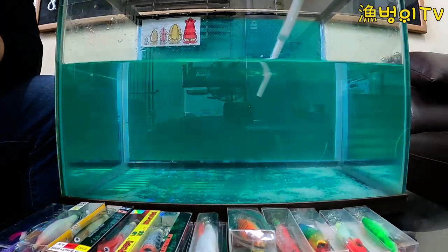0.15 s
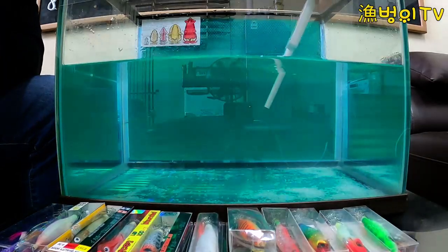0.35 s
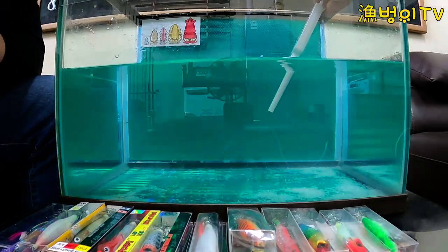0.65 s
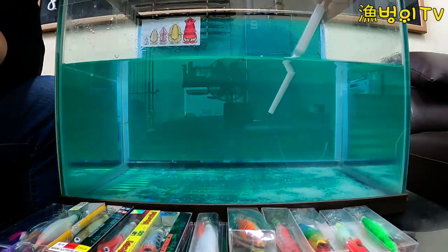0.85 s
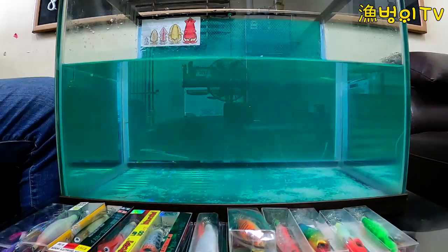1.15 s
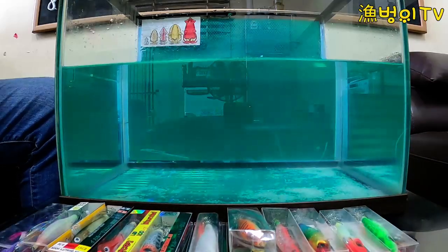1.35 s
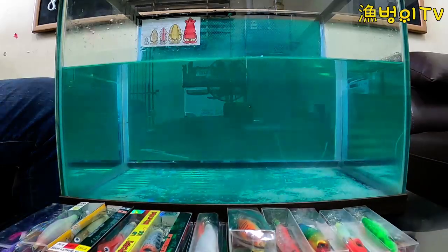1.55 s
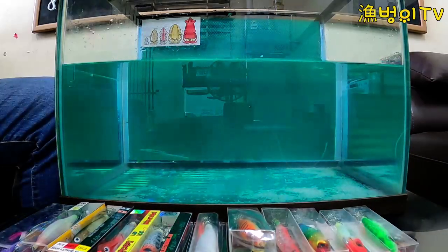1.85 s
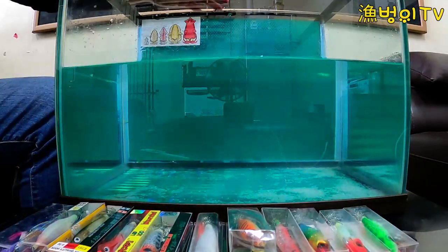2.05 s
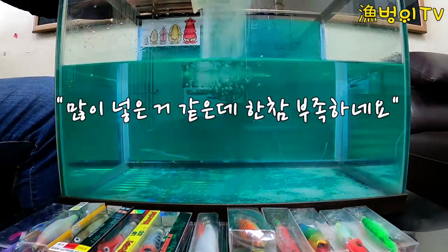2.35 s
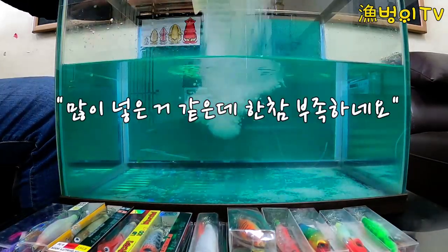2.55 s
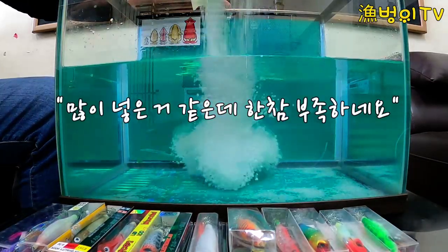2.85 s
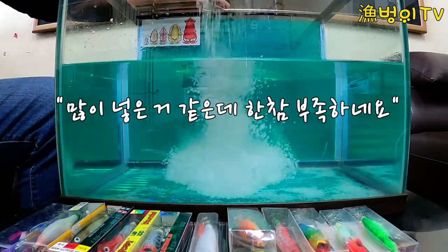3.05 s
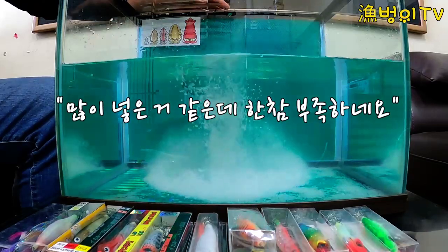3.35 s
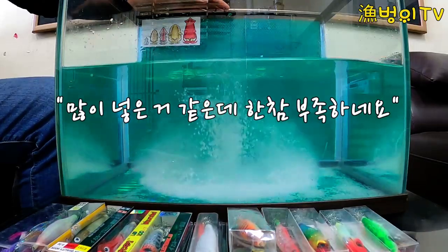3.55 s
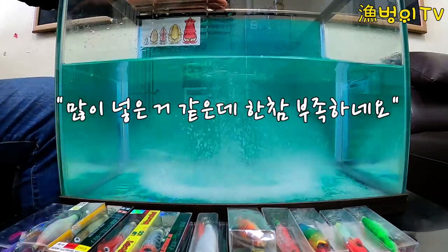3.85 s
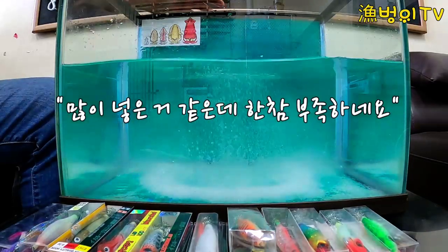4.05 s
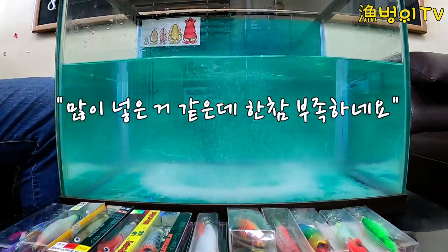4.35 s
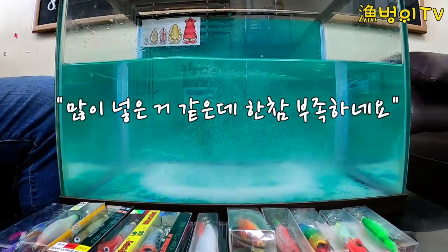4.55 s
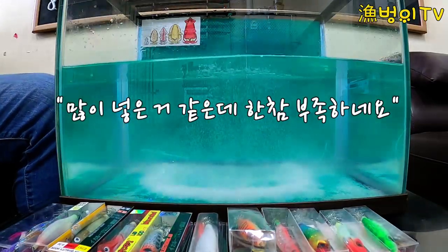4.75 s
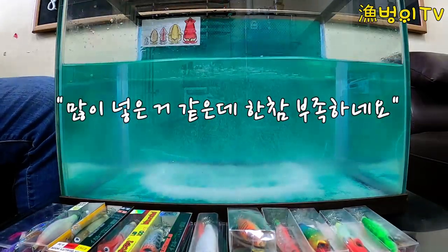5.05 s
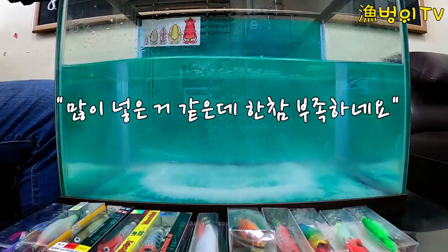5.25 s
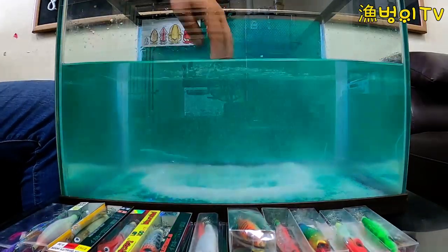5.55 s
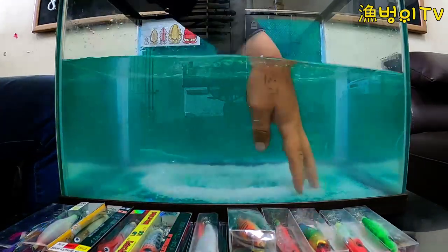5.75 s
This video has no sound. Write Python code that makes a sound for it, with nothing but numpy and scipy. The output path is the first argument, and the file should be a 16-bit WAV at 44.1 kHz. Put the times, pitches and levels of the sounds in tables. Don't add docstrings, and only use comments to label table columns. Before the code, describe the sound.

Coarse salt is scooped and knocked about in a hollow plastic tub, poured hissing into a glass tank twice, then shaken out, with faint ripples at the end.

```python
import sys
import numpy as np
from scipy import signal
from scipy.fft import rfft, irfft
from scipy.io import wavfile
from scipy.ndimage import uniform_filter1d

SR = 44100
rng = np.random.default_rng(int(sys.argv[2]) if len(sys.argv) > 2 else 0)


def unload_audio(sound):
    columns = np.transpose(np.atleast_2d(sound))
    steps = np.round(np.clip(columns, -1, 1) * 32767)
    wavfile.write(sys.argv[1], SR, steps.astype(np.int16))


def elevation(decibels):
    levels = np.asarray(decibels, float)
    return 10 ** (levels / 20)


N = 260190

# frequency_hz [Hz], level_db [dB per Hz]
GRAIN_SPECTRUM = [(130, -26.5), (290, -2), (380, -13), (580, -10), (980, -12.5), (1450, -8), (2050, -2.5),
                  (2750, -9.5), (3500, -4), (4000, -3.5), (4400, -2), (4900, -0.5), (5800, 1), (7000, 6.5)]
# frequency_hz [Hz], change_db [dB re first pour]
TILTED_TUB = [(600, 2.5), (850, 0), (1100, 4.5), (1500, 0), (2050, 0), (2750, 1.5), (3500, 0.5), (4250, -3),
              (4900, 4), (5800, -2), (6600, 2), (8500, 0)]
# frequency_hz [Hz], change_db [dB re first pour]
SPILLING_TUB = [(600, 1), (900, 7), (1250, 0), (1800, 0.5), (2200, -1), (2750, 2.5), (3500, -1.5),
                (4250, 1), (4900, 1.5), (5800, 2.5), (6800, 2), (8500, 2.5)]
# frequency_hz [Hz], change_db [dB re first pour]
EMPTY_TUB = [(500, 3.5), (750, 3.5), (1100, 5), (1500, 2), (2050, -3), (2750, 2), (3500, -4.5),
             (5000, -0.5), (7000, -0.5)]
TILT_S, SPILL_S, LAST_SHAKE_S = 3.75, 4.12, 4.7


def salt():
    s, (rush_db, fine_db, mass_db, boom_db) = movement()
    hits = grains(per_s=14000, spread_db=1.5, clump_db=0.51)
    out = singing(hits[0])

    posture = np.searchsorted([TILT_S, SPILL_S, LAST_SHAKE_S], np.arange(N) / SR)
    postures = [hits, shaped(hits, TILTED_TUB), shaped(hits, SPILLING_TUB), shaped(hits, EMPTY_TUB)]
    hits = through_wall(np.choose(posture, postures))

    ranges = [([130, 420], boom_db - 11.0),
              ([420, 700, 1150], mass_db - 3.5),
              ([1276, 1700, 2860, 4215], rush_db - 0.5),
              ([4200, 5800, 30000], fine_db + 3.5)]
    for edges_hz, range_db in ranges:
        level_db = np.interp(np.arange(N) / SR, s, range_db)
        parts = 0
        for low_hz, high_hz in zip(edges_hz, edges_hz[1:]):
            swell_db = 0.8 * drift(5) + 1.1 * drift(20)
            parts = parts + elevation(swell_db) * coloured(hits, GRAIN_SPECTRUM, low_hz, high_hz)
        out = out + elevation(level_db) * rms_one(parts)
    return out


def grains(per_s, spread_db, clump_db):
    sizes = elevation(spread_db * np.minimum(rng.exponential(1, (2, N)), 5))
    signs = rng.choice([-1, 1], (2, N))
    struck = rng.random((2, N)) < per_s / SR
    return rms_one(sizes * signs * struck * elevation(clump_db * drift(46.0)))


# time_s [s], flow_db [dB], lumps_db [dB]
POUR_ONE = [
    (1.87, -61, -3),
    (1.92, -32.5, 8),
    (2.08, -33, 16.5),
    (2.13, -28, 8.5),
    (2.33, -30, 4),
    (2.7, -26.5, 2.5),
    (3.1, -27.5, 4.5),
    (3.3, -34.5, 7),
    (3.43, -46, 6),
]
POUR_TWO = [
    (3.7, -49, -20),
    (3.81, -40, -3),
    (3.902, -31.5, 3.5),
    (3.98, -25.5, 3),
    (4.11, -30.5, 4),
    (4.24, -29.5, 9),
    (4.33, -35.5, 14.5),
    (4.41, -44, 18),
    (4.48, -58, 19),
]
# start_s [s], level_db [dB], settling [dB per s], fine_db [dB], lumps_db [dB]
JOLT_EVENTS = [(1.097, -44, 200, -8, 0), (1.137, -39, 400, -12, 2), (1.18, -44, 250, -4, 0),
               (1.255, -41, 250, -1, 0), (1.512, -37, 76, 1, 1), (1.65, -42.5, 150, 6, -4),
               (1.662, -40, 200, 0, 2), (1.69, -43, 100, -6, 0), (1.726, -44.5, 302, -2, 7),
               (1.778, -35, 42, -2, 2), (1.897, -45, 64, 8.5, 6), (2.122, -46, 60, 0, -9),
               (3.421, -36, 500, 0, -1), (3.432, -35, 349, -6, -13), (3.445, -39, 170, -4, -14),
               (3.513, -42, 43, -6, -2), (3.594, -46, 58, 0, -8), (3.745, -47.5, 60, 6, -10),
               (3.797, -36, 90, -2, -11), (4.729, -40, 300, -20, 0), (4.741, -42.5, 16, -11, 2),
               (4.834, -39, 74, 4, -11), (5.041, -33.5, 103, -8.5, -15), (5.206, -27.5, 197, -17, -8.5),
               (5.226, -34.5, 102, -7, 3)]
# peak_s [s], level_db [dB], settling [dB per s], fine_db [dB], lumps_db [dB]
SWAY_EVENTS = [
    (1.11, -61, 62, -7, 14),
    (1.16, -38.5, 105, -9.5, 4),
    (1.27, -40, 115, 2, 7.5),
    (1.33, -32.5, 120, -47, 4),
    (3.98, -36.5, 94, -10, 1),
    (4.17, -37, 110, 5, -10),
    (4.891, -25.5, 137, -3.5, -0.5),
]
# peak_s [s], level_db [dB], fading [dB per s]
FLEX_EVENTS = [(1.12, -31, 60), (1.27, -26.5, 157), (1.67, -53, 64), (1.78, -30.5, 54), (1.91, -38, 100),
               (2.11, -26.5, 76), (2.8, -28.5, 20), (3.1, -32.5, 97), (3.98, -40, 117), (4.29, -34.5, 103),
               (4.89, -30, 132), (5.09, -49, 60)]
# levels of rush, fine, lumps and boom [dB]
STRAY_DB = [-53, -56, -57.5, -99]
# start_s [s], end_s [s]
STRAY_S = (1.066, 5.4)
JOLT_RISE_DB_PER_S, SWAY_RISE_SHARE = 1302, 2
FINE_SETTLING, LUMP_SETTLING = 1, 1.55
FULL_FLOW_DB, FINE_RE_FLOW_DB, LUMP_RE_FLOW_DB = -28, 0, -11.5
FINE_FOLLOWS, LUMP_FOLLOWS, FINE_LOST_TO_LUMPS = 1.11, 1.94, 0.29


def movement():
    t = np.arange(0, N, 40) / SR
    falling = (t > STRAY_S[0]) & (t < STRAY_S[1])
    power = elevation(2 * np.array(STRAY_DB))[:, None] * falling + 1e-12

    for pour in (POUR_ONE, POUR_TWO):
        s, flow_db, lumps_db = np.transpose(pour)
        flow = np.interp(t, s, flow_db - FULL_FLOW_DB, left=-90, right=-90)
        lumps = np.interp(t, s, lumps_db)
        fine = FINE_RE_FLOW_DB + FINE_FOLLOWS * flow - FINE_LOST_TO_LUMPS * lumps
        mass = LUMP_RE_FLOW_DB + LUMP_FOLLOWS * flow + lumps
        power[:3] += elevation(2 * (FULL_FLOW_DB + np.array([flow, fine, mass])))

    for rows, sudden in ((JOLT_EVENTS, True), (SWAY_EVENTS, False)):
        s, db, fall, fine_db, lumps_db = np.transpose(rows)
        rise = JOLT_RISE_DB_PER_S if sudden else SWAY_RISE_SHARE * fall
        power[0] += surges(s, db, rise, fall)
        power[1] += surges(s, db + fine_db, rise, FINE_SETTLING * fall)
        power[2] += surges(s, db + lumps_db, rise, LUMP_SETTLING * fall)

    s, db, fade = np.transpose(FLEX_EVENTS)
    power[3] += surges(s, db, fade, fade)
    return t, 10 * np.log10(power)


def surges(s, peak_db, rise, fall):
    after = np.arange(0, N, 40)[:, None] / SR - s
    return np.sum(elevation(2 * (peak_db + np.minimum(after * rise, -after * fall))), axis=1)


# frequency_hz [Hz], width_hz [Hz], lift_db
# [dB]
WALL_MODES = [(284, 30, 2.5), (580, 31, 1.5), (705, 36, -6.5), (962, 42, -5.5), (1250, 24, 5),
              (1427, 24, 6.5), (1510, 13, 1), (2335, 69, 3.5), (3300, 80, 2), (4270, 91, -3.5),
              (4830, 110, -1.5), (6500, 150, 1), (11550, 310, -12.5)]


def through_wall(x):
    hz = np.fft.rfftfreq(N, 1 / SR)[:, None]
    centre, width, lift = np.transpose(WALL_MODES)
    gain_db = np.sum(lift / (1 + (2 * (hz - centre) / width) ** 2), axis=1)
    return irfft(rfft(x) * elevation(gain_db), N)


# start_s [s], length_s [s], from_hz [Hz], to_hz [Hz], level_db [dB]
SINGING_PATCHES = [(1.15, 0.047, 1750, 1870, -40), (1.31, 0.077, 4100, 3700, -48),
                   (1.33, 0.045, 6700, 6900, -50), (1.32, .04, 940, 960, -39),
                   (1.51, 0.075, 5100, 4700, -48), (1.68, 0.046, 3000, 3100, -44),
                   (1.89, 0.12, 5500, 5600, -42), (1.9, 0.075, 7300, 7000, -40),
                   (1.91, 0.16, 1800, 1920, -39), (2.37, 0.36, 7700, 7600, -42),
                   (2.07, 0.18, 1450, 1440, -44.5), (4.725, .08, 1300, 1440, -53),
                   (4.725, .06, 2300, 1900, -46), (4.726, .09, 3100, 2900, -47),
                   (2.5, .15, 5600, 5500, -42), (5.21, .09, 3100, 2900, -43), (5.04, .06, 3000, 2800, -46),
                   (4.87, .07, 4400, 4000, -40), (5.2, 0.057, 1100, 1200, -38),
                   (2.08, .18, 1810, 1860, -40.5), (2.11, 0.13, 3700, 4000, -41.5),
                   (2.42, 0.27, 3600, 3200, -44), (2.42, 0.32, 5800, 6500, -46),
                   (2.74, 0.3, 2200, 1940, -39), (2.77, 0.31, 3700, 3400, -48),
                   (3.01, 0.39, 2150, 1850, -43), (2.82, 0.19, 590, 570, -43.5),
                   (3.93, 0.09, 5400, 4500, -37), (3.94, 0.16, 7200, 6600, -38),
                   (3.94, 0.14, 3800, 2960, -40), (3.93, 0.2, 1600, 1500, -41.5),
                   (4.12, .11, 6300, 7400, -41), (4.16, 0.12, 900, 930, -42), (4.14, 0.15, 1800, 1840, -41),
                   (4.18, 0.095, 2540, 2800, -36.5), (4.87, .06, 3100, 3300, -40),
                   (4.84, 0.054, 7100, 6300, -37), (5.2, 0.075, 2400, 1300, -40),
                   (5.035, 0.074, 1640, 1950, -42)]


def singing(hits):
    out = np.zeros(N)
    for s, length, from_hz, to_hz, db in SINGING_PATCHES:
        i, share = round(s * SR), np.linspace(0, 1, round(length * SR))
        turn = np.exp(2j * np.pi * np.cumsum(from_hz + (to_hz - from_hz) * share) / SR)
        narrow = signal.butter(2, 0.1 * from_hz, fs=SR, output="sos")
        slow = signal.sosfilt(narrow, hits[i:i + len(share)] / turn)
        add_at(out, s, elevation(db) * rms_one((slow * turn).real) * np.sin(np.pi * share))
    return out


# start_s [s], peak_db [dB], pitch_hz [Hz], crack_db [dB re peak], t60_s [s]
SNAP_EVENTS = [(1.107, -40, 1900, -3, 0.028), (1.1468, -9.5, 1930, 7.5, 0.0082),
               (1.2257, -37, 1910, -12, 0.022), (1.263, -23, 1760, 3, 0.022),
               (1.2987, -23.5, 3900, 3, 0.032), (1.3143, -16.5, 1940, 3, 0.028),
               (1.403, -29, 1700, -7, 0.014), (1.4312, -35, 1760, -29, 0.037),
               (1.5094, -30, 1700, -27, 0.0039), (1.6583, -21.5, 2200, 5.5, 0.016),
               (1.7752, -16, 1750, -2.5, 0.018), (2.0748, -16, 1700, -4, 0.0071),
               (3.42, -23, 1790, 12, 0.0076), (3.5084, -21.5, 1570, -2, 0.037),
               (3.6384, -30, 2140, 0, 0.018), (3.6732, -30, 1960, 0, 0.02), (3.698, -32, 2180, 6, 0.012),
               (4.728, -37, 1290, -40, 0.013), (4.7675, -37, 1450, -40, 0.035),
               (5.039, -28, 1730, -6, 0.058), (5.208, -26, 1900, -5, 0.029)]
CRACK_HZ = 4360


def snaps():
    length = 2000
    out, t = np.zeros(N + length), np.arange(length) / SR
    for s, peak_db, hz, crack_db, t60 in SNAP_EVENTS:
        rattle = rng.standard_normal(length) * elevation(-60 * t / t60) * np.minimum(t / 0.0004, 1)
        blow = rattle - 2.5 * (np.arange(length) == 8)
        wall = band_pass(blow, 0.87 * hz, 1.14 * hz)
        crack = band_pass(blow, 0.72 * CRACK_HZ, 1.45 * CRACK_HZ)
        crack = crack + elevation(-14.5) * np.diff(blow, n=2, prepend=[0, 0])
        knock = peak_one(wall) + elevation(crack_db + 5.5) * peak_one(crack)
        add_at(out, s, elevation(peak_db + 6.0) * peak_one(knock))
    return signal.sosfilt(signal.butter(3, 10500, fs=SR, output="sos"), out[:N])


# start_s [s], peak_db [dB], pitch_hz [Hz],
# t60_s [s]
THUD_EVENTS = [(1.104, -23.5, 221, 0.1), (1.148, -11, 420, 0.028), (1.184, -32, 167, 0.16),
               (1.264, -14, 208, 0.091), (1.431, -23, 442, 0.045), (1.659, -28, 212, 0.058),
               (1.66, -21, 480, 0.033), (0.031, -31, 50.3, 0.58), (1.775, -30, 247, 0.19),
               (1.929, -21, 513, 0.078), (2.0748, -3.5, 551, 0.02), (2.107, -6.5, 279, 0.051),
               (2.752, -22.5, 285.6, 0.21), (2.81, -19, 314, 0.077), (3.416, -34, 273, 0.077),
               (3.508, -8, 583, 0.022), (3.511, -15.5, 260, 0.031), (4.725, -31, 156, 0.06),
               (4.879, -21, 654, 0.068), (4.86, -23.5, 117, 0.15), (4.87, -24, 170, .12),
               (2.17, -28, 200, .15), (1.98, -29, 250, .12), (2.18, -30.5, 61.6, 0.66),
               (1.901, -25.5, 276, 0.091)]


def thuds():
    length = 8000
    out = np.zeros(N + length)
    soft = 1 - np.exp(-np.arange(length) / SR / 0.0019)
    for s, peak_db, hz, t60 in THUD_EVENTS:
        body = ring(length, hz, t60)
        body += 0.92 * ring(length, 1.83 * hz, 0.38 * t60)
        body += 0.29 * ring(length, 0.6 * hz, 1.74 * t60)
        add_at(out, s, elevation(peak_db - 3.5) * soft * body)
    return out[:N]


def ring(length, hz, t60):
    t = np.arange(length) / SR
    return np.sin(2 * np.pi * hz * t) * elevation(-60 * t / t60)


# start_s [s],
# peak_db [dB], centre_hz [Hz]
TAP_EVENTS = [(0.985, -38, 7000), (1.0663, -38, 7000), (1.1468, -26, 6500), (1.3148, -21, 4500),
              (1.66, -22, 9500), (3.6985, -26, 4970), (1.51, -26, 2500), (1.4317, -21.5, 2500),
              (1.146, -20, 3000), (1.776, -17, 3500), (2.0746, -7.5, 1660), (2.107, -11.5, 3500),
              (3.4205, -24, 6500), (3.5946, -30, 3500), (3.613, -33, 4550), (3.752, -33, 5000),
              (4.7415, -27, 1700), (5.2045, -27, 4500), (3.5076, -12, 2200), (3.5092, -18, 2000),
              (3.926, -13, 2500)]


def taps():
    out = np.zeros(N)
    push = -1.0 * (np.arange(400) == 0)
    for s, peak_db, hz in TAP_EVENTS:
        add_at(out, s, elevation(peak_db) * peak_one(band_pass(push, 0.47 * hz, 1.87 * hz)))
    return out


# start_s [s], length_s [s], centre_hz [Hz], width [share], level_db [dB]
RIPPLE_EVENTS = [
    (5.543, .03, 4600, .5, -65),
    (5.602, .1, 2070, .06, -53),
    (5.64, 0.041, 3400, .06, -57),
    (5.645, .14, 5200, 0.71, -55.5),
    (5.66, .12, 1800, .25, -57),
    (5.702, 0.09, 7000, .1, -58),
    (5.62, .06, 8100, .06, -60),
    (5.81, 0.06, 7000, .4, -58.5),
    (5.88, .02, 4000, .5, -63),
]


def ripples():
    out = np.zeros(N + SR)
    for s, length, hz, width, db in RIPPLE_EVENTS:
        share, width = np.linspace(0, 1, round(length * SR)), np.clip(width, 0.02, 0.8)
        noise = rng.standard_normal(9000)
        fizz = band_pass(noise, hz * (1 - width), hz * (1 + width))[-len(share):]
        add_at(out, s, elevation(db) * rms_one(fizz) * np.sin(np.pi * share ** 0.57))
    return out[:N]


def shop(x):
    t = np.arange(SR // 3) / SR
    tails = rng.standard_normal((2, len(t))) * elevation(-60 * t / 0.4) * (t > 0.006)
    tails = tails / np.sqrt(np.sum(tails[0] ** 2))
    return signal.fftconvolve(x[None], tails, axes=1)[:, :N]


# frequency_hz [Hz], level_db [dB per Hz]
VENTILATION_SPECTRUM = [(25, -9), (42, -5), (60, 4.5), (80, -4), (150, -6), (250, -3), (350, -7), (500, -9),
                        (700, -15), (1000, -23), (2000, -30), (2600, -37), (3700, -43), (5400, -45.5),
                        (6900, -40.5), (9000, -40)]
# [dB, air above 2.5 kHz]
VIEW_LEVELS = [
    (-41.5, -1),
    (-42, 8),
    (-42, 0),
]
# start_s [s], end_s [s]
SCENE_CHANGES = [
    (.9862, 1.066),
    (5.5015, 5.541),
]


def ventilation():
    white = rng.standard_normal((2, N))
    view = np.searchsorted([end for start, end in SCENE_CHANGES], np.arange(N) / SR)
    low = coloured(white, VENTILATION_SPECTRUM, high_hz=2500)
    high = coloured(white, VENTILATION_SPECTRUM, low_hz=2500)
    rumble_db, hiss_db = np.array(VIEW_LEVELS)[view].T
    scale = elevation(rumble_db + 1.3 * drift(9.6)) / np.sqrt(np.mean(low ** 2))
    return scale * (low + elevation(hiss_db + 1.5 * drift(5.0)) * high)


def rms_one(x):
    return x / np.sqrt(np.mean(x ** 2) + 1e-20)


def peak_one(x):
    return x / np.abs(x).max()


def add_at(out, s, burst):
    i = round(s * SR)
    out[i:i + len(burst)] += burst


def band_pass(x, low_hz, high_hz):
    return signal.sosfilt(signal.butter(2, [low_hz, high_hz], "band", fs=SR, output="sos"), x)


def high_pass(x, hz, order):
    return signal.sosfiltfilt(signal.butter(order, hz, "high", fs=SR, output="sos"), x)


def at_hz(points, hz):
    known_hz, values = np.transpose(points)
    return np.interp(np.log(hz), np.log(known_hz), values)


def drift(rate_hz):
    r = np.exp(-80 * np.pi * rate_hz / SR)
    slow = signal.lfilter([1], [1, -2 * r, r * r], rng.standard_normal(N // 40 + 2002))[2000:]
    return np.interp(np.arange(N) / 40, np.arange(len(slow)), rms_one(slow))


def shaped(x, spectrum):
    return irfft(rfft(x) * elevation(at_hz(spectrum, np.fft.rfftfreq(N, 1 / SR) + 1)), N)


# frequency_hz [Hz], side_db [dB re mid]
SIDE_SPECTRUM = [(40, -28), (250, -24), (600, -22), (1000, -25), (4000, -24), (9000, -20), (13000, -6)]


def coloured(x, spectrum, low_hz=1, high_hz=30000):
    hz = np.maximum(np.fft.rfftfreq(N, 1 / SR), 1)
    window = 1 / np.sqrt((1 + (low_hz / hz) ** 14) * (1 + (hz / high_hz) ** 14))
    gain = elevation(at_hz(spectrum, hz)) * window * np.minimum(hz / 20, 1) ** 2
    mid, side = irfft(rfft(x) * gain * [np.ones_like(hz), elevation(at_hz(SIDE_SPECTRUM, hz))], N)
    return np.array([mid + side, mid - side])


# time_s [s], pan_db [dB, left minus right], width_db
# [dB]
TUB_PLACE = [(1.0, 0, -5), (1.07, 0.5, 13.5), (1.7, -.5, 12.5), (1.85, 0.5, 3), (2.25, -1, -3),
             (2.33, 0, -4), (2.421, 0, 2), (2.62, -0.5, -1.5), (2.7, -0.5, -7), (2.78, 0, 1.5), (3.3, 0, 0),
             (3.75, 0, -3.5), (4.22, 0, -1.5), (4.35, 0, -4.5), (4.75, 0, 0), (5.0, 0.1, 3.5),
             (5.6, 0.5, 5), (5.75, 3, -5)]


def scene():
    s, pan_db, width_db = np.transpose(TUB_PLACE)
    t, half = np.arange(N) / SR, np.array([[0.5], [-0.5]])
    hollow, sharp = thuds(), snaps() + taps()
    tub = salt() + sharp + hollow * elevation(half * -1)
    tub = tub * elevation(half * np.interp(t, s, pan_db))
    left, right = tub + elevation(-22.0) * shop(sharp + hollow) + ventilation() + ripples()
    mid, side = (left + right) / 2, (left - right) / 2
    return mid + [[1], [-1]] * elevation(np.interp(t, s, width_db))[None] * side


# start_s [s], length_s [s], depth_db [dB]
TREBLE_DIPS = [
    (1.063, 0.025, -6),
    (1.124, .02, -7),
    (1.754, 0.022, -2),
    (3.487, .02, -0.5),
    (4.709, 0.023, -2),
]


def starved(x):
    t, dip_db = np.arange(N) / SR, 0
    for s, length, depth_db in TREBLE_DIPS:
        edge = np.minimum((t - s) / 0.0079, (s + length - t) / 0.00092)
        dip_db = dip_db + depth_db * np.clip(edge, 0, 1)
    return x + (elevation(dip_db) - 1) * high_pass(x, 720, order=2)


# frequency_hz [Hz], response_db [dB]
MICROPHONE_RESPONSE = [(7300, 0), (8300, -4.5), (8750, -9), (9500, -12.5), (11000, -13.5), (13000, -20),
                       (15000, -25), (15800, -59)]
# start_s [s], end_s [s]
SUDDEN_STRETCHES = [(.96, 1.16), (1.25, 1.33), (1.39, 1.53), (1.64, 1.73), (1.73, 1.8), (2.05, 2.14),
                    (3.4, 3.53), (3.58, 3.83), (4.71, 4.75), (4.81, 4.85), (5.02, 5.06), (5.18, 5.23),
                    (5.49, 5.68)]


def dulled_gated_treble(x):
    x, t = shaped(x, MICROPHONE_RESPONSE), np.arange(N) / SR
    sudden = sum((t > start) & (t < end) for start, end in SUDDEN_STRETCHES)
    sudden = uniform_filter1d(1.0 * sudden, size=300)
    steady = fine_pitch_gate(x)
    return steady + sudden * high_pass(fine_time_gate(x) - steady, 7500, order=4)


# frequency_hz [Hz], threshold_db [dB re local mean]
GATE_THRESHOLD = [(7000, -20), (8300, -1.5), (9600, 1), (11000, 3.5), (13500, 4.5), (15500, 6)]
SUDDEN_THRESHOLD_DB = [-6, -8, -7, -9, -3, -4, -2, -3, -4, -5, -3, -3, -2]


def fine_time_gate(x):
    hz, s, cells = signal.stft(x, SR, "cosine", nperseg=256)
    power = np.abs(cells.mean(axis=0)) ** 2
    usual = smooth(power, bins=6, frames=6)
    stretch = np.maximum(np.searchsorted(np.array(SUDDEN_STRETCHES)[:, 0], s) - 1, 0)
    threshold_db = at_hz(GATE_THRESHOLD, hz + 1)[:, None] + np.array(SUDDEN_THRESHOLD_DB)[stretch]
    kept = power > usual * elevation(2 * threshold_db)
    return signal.istft(cells * kept, SR, "cosine", nperseg=256)[1][:, :N]


def smooth(x, bins, frames):
    return uniform_filter1d(uniform_filter1d(x, size=bins, axis=0), size=frames, axis=1)


# frequency_hz [Hz], level_db [dB per cell]
BAND_FLOOR = [(7000, -135), (9000, -116), (11000, -113), (13000, -113), (15000, -112)]


def fine_pitch_gate(x):
    hz, _, cells = signal.stft(x, SR, "cosine", nperseg=2048)
    mid, side = (cells[0] + cells[1]) / 2, (cells[0] - cells[1]) / 2
    broad_mid, broad_side = [smooth(np.log(np.abs(v) ** 2 + 1e-20), bins=24, frames=2) for v in (mid, side)]
    side_floor = (-1 + at_hz(SIDE_SPECTRUM, hz + 1))[:, None] * np.log(10) / 10
    side = side * ((broad_side - broad_mid > side_floor) | (hz[:, None] > 10800))
    cells = np.array([mid + side, mid - side])

    power = np.abs(cells) ** 2
    usual = uniform_filter1d(power, size=32, axis=1)
    kept = power > usual * elevation(2 * at_hz(GATE_THRESHOLD, hz + 1))[:, None]
    band = np.arange(len(hz)) // 32
    band_power = np.add.reduceat(power, np.arange(0, len(hz), 32), axis=1) / 32
    band_db = 10 * np.log10(band_power + 1e-20)
    luck_db = -7 * rng.standard_normal(band_db.shape[1:])
    kept &= (band_db + luck_db)[:, band] > at_hz(BAND_FLOOR, hz + 1)[:, None]
    return signal.istft(cells * kept, SR, "cosine", nperseg=2048)[1][:, :N]


def roll_off(x):
    return signal.sosfilt(signal.butter(12, 16040, fs=SR, output="sos"), x)


def record(dry):
    t = np.arange(N) / SR
    running = 1 - sum((t >= start) & (t < end) for start, end in SCENE_CHANGES)
    rounded = 0.91 * np.tanh(dry / 0.86)
    mix = dulled_gated_treble(starved(rounded)) * running
    return roll_off(mix)


dry = scene()
out = record(dry)
unload_audio(out)
```